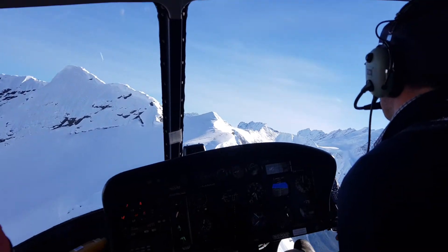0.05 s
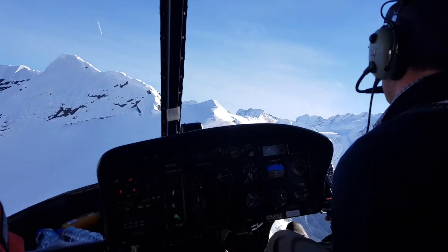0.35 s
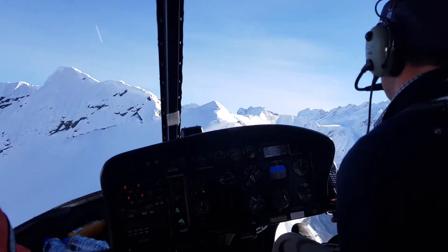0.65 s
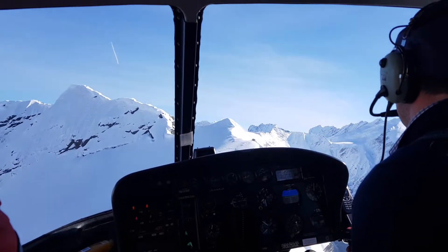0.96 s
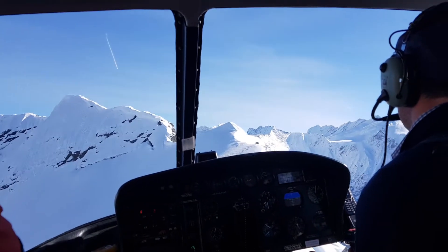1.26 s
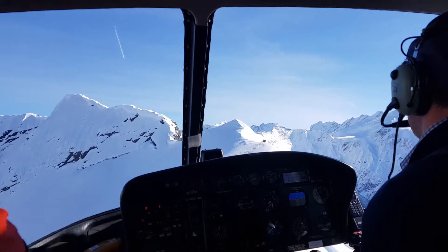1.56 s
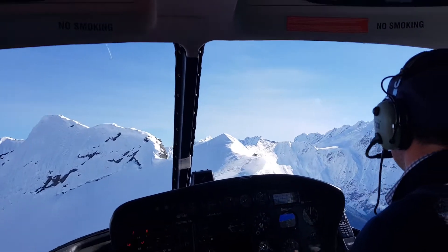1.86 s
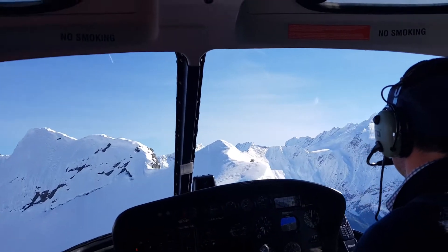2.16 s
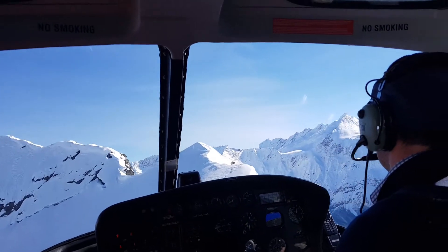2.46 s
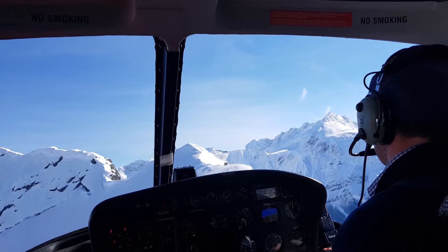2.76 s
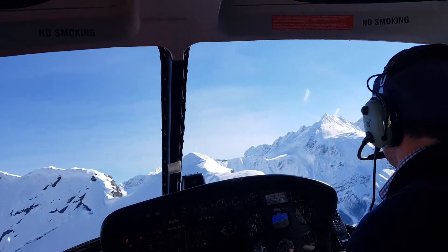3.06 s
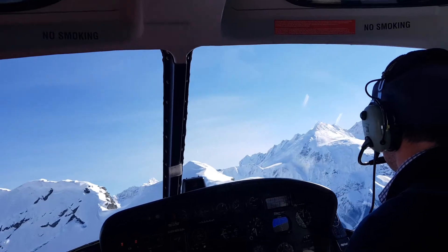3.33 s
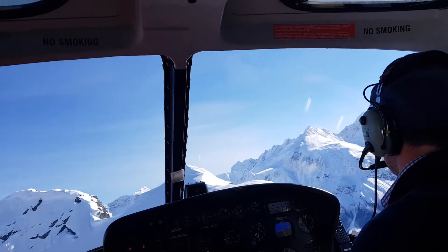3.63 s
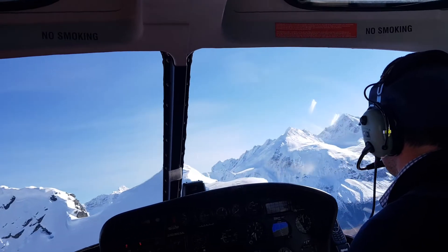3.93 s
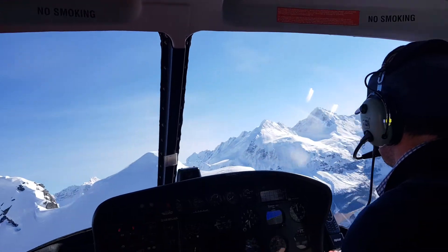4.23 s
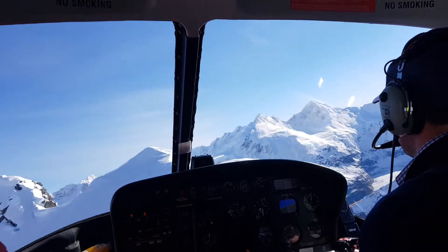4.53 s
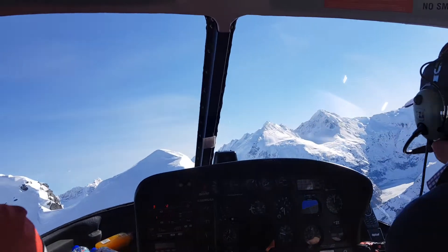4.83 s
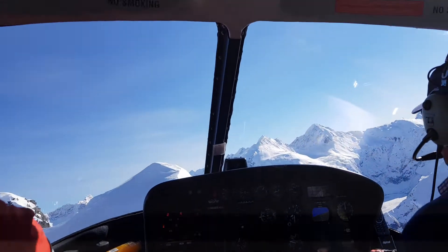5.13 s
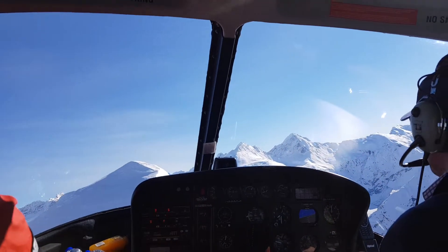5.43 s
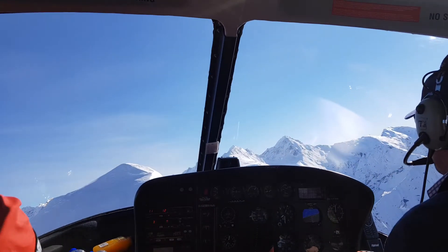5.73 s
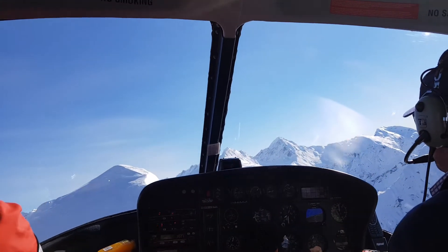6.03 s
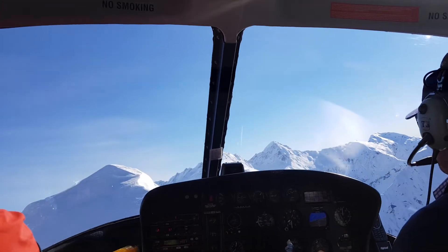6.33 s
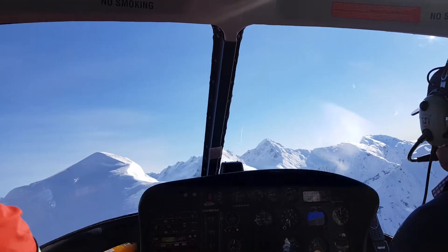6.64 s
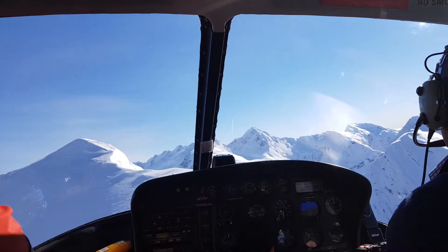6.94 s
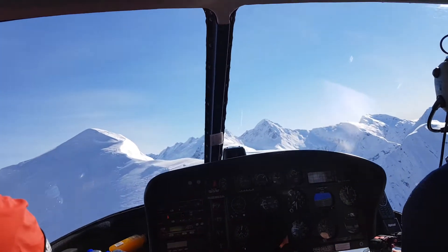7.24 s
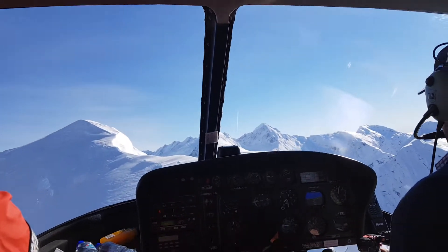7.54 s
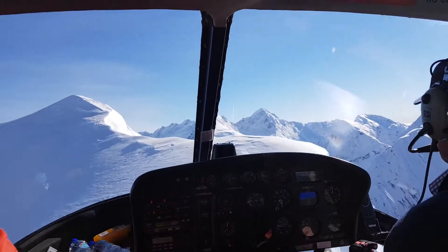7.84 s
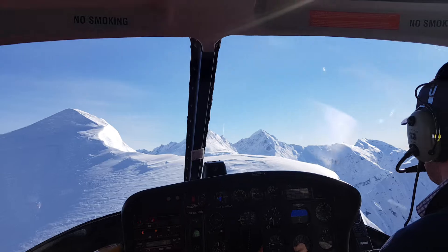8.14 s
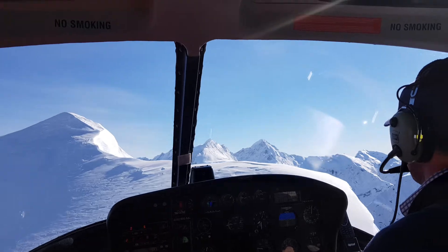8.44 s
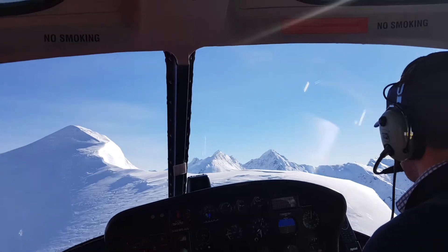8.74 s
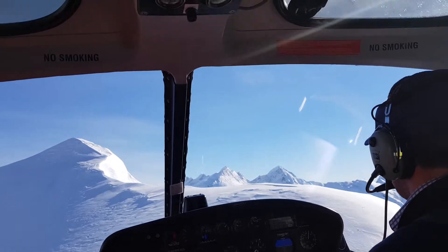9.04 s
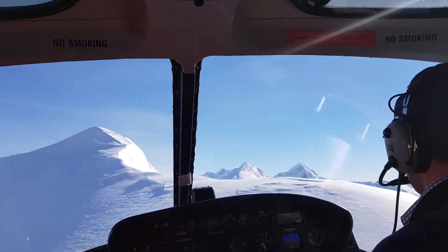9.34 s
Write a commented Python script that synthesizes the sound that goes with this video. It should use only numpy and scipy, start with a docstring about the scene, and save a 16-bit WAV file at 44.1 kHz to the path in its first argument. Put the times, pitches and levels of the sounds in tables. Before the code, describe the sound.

The sound is the cabin of a light helicopter in flight, heard from a seat through a hand-held stereo microphone. From the start, a fast, deep rotor thump beats against a low tail rotor drone, with a steady gear whine and fluttering gear tones close overhead, a very high turbine whistle and rushing air. At about 1.3 seconds the power eases and a thin, high valve hiss opens, lasting until about 5.4 seconds. Something loose gives one short, dry tick at 2 seconds. The rotor thump is heaviest around 3 to 4 seconds. From 5 seconds the turbine rises slightly in pitch, the drone strengthens and the wind grows while the thumping recedes. Uneven gusts slap the canopy between 5 and 7 seconds, then again near 8.3 and 9 seconds. The noise continues to the end at about 9.5 seconds.

```python
"""Cabin of a light turbine helicopter over mountains; a hand-held stereo pair, gearbox close overhead.
From the start the three-blade rotor thumps against the tail rotor's drone, gear teeth sing and the
turbine whistles high up. After a second the pilot eases off and the bleed valve hisses; something
loose ticks once. Near 3-4 s the rotor is loudest, sinking into its own wake. From 5 s the turbine
spools up again, the wind grows and gusts slap the canopy."""
import sys
import numpy as np
from scipy import signal
from scipy.fft import rfft, irfft, next_fast_len
from scipy.io import wavfile

SR = 44100
rng = np.random.default_rng(int(sys.argv[2]) if len(sys.argv) > 2 else 0)


def master_out(mix):
    """Clip the mix to full scale and print it as 16-bit PCM to the path in sys.argv[1]."""
    frames = np.transpose(np.atleast_2d(mix))
    ceiling = np.clip(frames, -1, 1)
    pcm = np.round(ceiling * 32767).astype(np.int16)
    wavfile.write(sys.argv[1], SR, pcm)


N = 418068
T = np.arange(N) / SR
HZ = np.fft.rfftfreq(N, 1 / SR)
BLADE_HZ, TAIL_HZ, MESH_HZ, BEVEL_HZ = 19.48, 68.62, 647.66, 1712  # at nominal shaft speed

# shaft speed, heard as the bevel gear's pitch: (time [s], pitch [Hz])
SHAFT_SPEED = [(0.0, 1707), (0.05, 1708), (0.39, 1713), (1.53, 1719), (3.11, 1714), (3.96, 1705),
               (4.83, 1706), (5.38, 1698), (7.42, 1715), (8.42, 1714), (9.06, 1695), (9.48, 1695)]
# the pilot eases off, then pulls the power back in: (time [s], torque [0-1])
SHAFT_TORQUE = [(0, 1), (1.2, 0.94), (2.1, 0.43), (3.4, 0.05), (4.8, .05), (5.4, 0.28), (6.5, 0.86),
                (7.2, 0.94), (8.1, 0.84), (9, 0.95), (9.48, 0.89)]
# how hard the air presses on the airframe: (time [s], air load [0-1])
AIRFRAME_LOAD = [(0, 0.03), (1, 0.02), (3.4, 0.14), (4.8, .28), (5.25, 0.79), (7, 1), (7.55, 0.56),
                 (8.7, 1), (9.48, 1)]
# the main rotor sinks into its own wake: (time [s], relative thump [dB], relative wash [dB])
ROTOR_WAKE = [(0, -22.5, -23.5), (1.2, -24.5, -24), (2, -23, -23), (3.2, -19, -19.5), (4.2, -18.5, -22),
              (5.3, -24, -20.5), (6.4, -27, -22.5), (7.2, -25.5, -23.5), (8.1, -32, -26.5), (8.9, -31, -28),
              (9.48, -35, -23)]
# main rotor harmonics: (multiple, relative level [dB])
BLADE_HARMONICS = [(1, -7), (2, -4.5), (3, -6.5), (4, -2.5), (5, -7), (6, -13), (7, -26.5), (8, -20),
                   (9, -22.5)]
# tail rotor harmonics: (multiple, relative level at first [dB], after power-up [dB])
TAIL_HARMONICS = [(1, 0.5, 0), (2, -10, -11.5), (3, -22.5, -12), (4, -29.5, -34), (5, -20.5, -21),
                  (6, -36, -40)]
# planet gear tones: (multiple, unloaded level [dB], added at full torque [dB],
# added at full air load [dB], left minus right [dB], flutter depth [factor], left lead [rad])
MESH_HARMONICS = [(1, -35, 7, -.5, 3, 0.13, 1.13), (2, -36, 10.5, -2, 4.5, 0.18, 1.18),
                  (3, -47.5, 8.5, 4.5, 0, 0.52, 1.35), (4, -48, 13, 0, -.5, 0.5, 1.47),
                  (5, -37, 6, 3.5, 2, 0.31, 1.45), (6, -50.5, 4.5, 7.5, 7.5, 0.32, 1.13),
                  (7, -52, 2.5, 4.5, -3, 0.42, 1.2), (8, -52, 10.5, 1, 3, 0.95, 1.47),
                  (9, -54.5, 7, -0.5, 3, 0.66, 1.9), (10, -53, 4, 0, 0, 1.8, 1.5),
                  (11, -69, 12, 5, -3, 1.8, 1.5)]
# chatter of the passing planets: (time [s], depth [factor])
PLANET_CHATTER = [(0, 0.73), (1.2, 0.61), (1.6, 0.14), (3.7, .3), (5.4, 1.3), (6, 1.1), (7.1, 0.29),
                  (8.8, .35), (9.48, 0.68)]
# one mesh tone rings in the cabin, swelling and fading: (time [s], added level [dB])
CABIN_RINGING = [(0, -2.5), (1.2, -3.5), (1.65, 2.5), (2.85, 2), (4.5, -3.5), (5.5, 0), (6.4, -2), (8.7, 4),
                 (9.48, -5.5)]
# the microphones drift through the bevel whine's standing wave:
# (time [s], relative level [dB], left minus right [dB], left lead [rad])
BEVEL_AT_MICS = [(0, -26.5, -1, 1.25), (.9, -26, 3, 1.73), (1.55, -26, 13, 0.99), (2, -28.5, 6.5, 0.11),
                 (3.2, -28.5, 6, -0.52), (4.1, -32, 15, -1), (4.6, -29.5, 7, -1.1), (5.4, -32.5, 12, -1.9),
                 (6.5, -30, 8, -0.43), (7.25, -32, 22, 0), (7.9, -30, 10, 0.25), (8.9, -31, 13, .3),
                 (9.48, -35, 12, 0.99)]
# pumps and accessory gears: (nominal pitch [Hz], level [dB], left minus right [dB])
ACCESSORY_TONES = [(690, -48.5, -8), (1682, -45.5, 0), (2377, -53, 4), (2680, -56, 3), (3140, -56, 3),
                   (3405, -56, -5)]
# air noises as heard from the seat, each: (frequency [Hz], relative density [dB])
WASH_SPECTRUM = [(10, -22), (30, -12), (50, -2), (75, 0.5), (125, 1.5), (165, -4.5), (220, -9),
                 (400, -27.5), (1000, -58)]
WIND_SPECTRUM = [(80, -18), (170, -4.5), (230, 0), (330, -3), (500, -6), (650, -9.5), (830, -18),
                 (1060, -17.5), (1400, -27), (2000, -27), (4000, -47)]
DOOR_SPECTRUM = [(300, -2), (900, 4), (1500, 3.5), (2200, -0.5), (2900, -3), (4200, -10), (6000, -20),
                 (7000, -21), (9000, -31), (16000, -42)]
HISS_SPECTRUM = [(1000, -0.5), (3000, 6.5), (5000, 7), (6200, 3), (7300, -0.5), (8000, -1.5), (9500, -2.5),
                 (11500, 3), (13000, 0), (14500, 1), (15700, 4)]
GUST_SPECTRUM = [(150, -23), (330, -7.5), (480, 4.5), (580, -4), (800, -12), (1080, -11), (1400, -26),
                 (3000, -36), (8000, -69)]
# gusts on the canopy: (start [s], length [s], level [dB], tilt [dB/octave])
CANOPY_GUSTS = [(4.98, 0.75, -26, -7), (5.75, 0.89, -29, -1), (6.655, .45, -23.5, 4), (8.3, 0.49, -32, -4),
                (9.05, 0.35, -26, -8)]
# the turbine's compressor tone: (time [s], pitch [Hz])
COMPRESSOR_PITCH = [(0, 8950), (.6, 8850), (1.3, 8760), (2.1, 8570), (3.2, 8680), (5, 8740), (6, 9020),
                    (7.8, 8990), (9.48, 9250)]
# the bleed valve opens in steps while the turbine runs slow: (start [s], length [s], level [dB])
BLEED_STEPS = [(1.27, 1.17, -42.5), (2.47, 1.42, -47), (3.89, 1.5, -45)]
# something loose in the cabin: (time [s], level [dB])
CABIN_KNOCKS = [(2.023, -16)]
# likeness of the air noise at the two microphones: (frequency [Hz], correlation [0-1])
MIC_CORRELATION = [(40, .99), (80, 0.86), (150, 0.87), (300, 0.85), (600, 0.64), (1200, 0), (2500, 0)]
# microphone colour, the left mostly louder: (frequency [Hz], left gain [dB], right gain [dB])
MIC_RESPONSE = [(60, 0.97, -.9), (250, 1, -1.6), (1050, 1.37, -1), (1990, -0.18, 0), (6380, -0.5, 0.5),
                (7300, 3.5, -10), (8000, 2, -17), (8800, 3.5, -8.5), (9700, 3.5, -7), (10700, 4.5, -5),
                (12000, 3, 0), (15600, 2.5, -3.5)]


def main_rotor(blades, uneven_db=1.5, gain_db=-.5, smear=.12):
    """Each blade passing overhead presses a thump into the cabin, whose ringing smears it."""
    thumps = sum(amp(db) * np.cos(2 * np.pi * k * blades - smear * (k - 3) ** 2)
                 for k, db in BLADE_HARMONICS)
    return np.sqrt(2) * thumps * amp(curves(ROTOR_WAKE)[0] + gain_db + uneven_db * drift(10))


def tail_rotor(clock, power_up_s=4, rise_s=3, gain_db=-21.5):
    """A drone from far aft, shaken by the main rotor's wake; torque lifts it and shifts its phase."""
    turns = TAIL_HZ * clock - .14 + .36 * curves(SHAFT_TORQUE)[0] + 0.008 * drift(3.4)
    powered = np.clip((T - power_up_s) / rise_s, 0, 1)
    drone = sum(amp(early_db + (late_db - early_db) * powered) * np.cos(2 * np.pi * k * turns)
                for k, early_db, late_db in TAIL_HARMONICS)
    return np.sqrt(2) * drone * loaded(torque_db=5.5) * amp(gain_db + .5 * drift(8.9))


def planet_gears(clock, mast, ringing_order=5):
    """Meshing teeth just overhead sing a harmonic series that flutters as five planets go round."""
    out = np.zeros((2, N))
    chatter = curves(PLANET_CHATTER)[0] * np.cos(2 * np.pi * 5 * mast)
    for order, db, torque_db, air_db, pan_db, depth, lead in MESH_HARMONICS:
        teeth = 0.97 * tooth_flutter(mast)
        shimmer = 0.59 * (drift(31) + 1j * drift(35))
        wobble = 1 + depth * (teeth + chatter + shimmer)
        turns = order * MESH_HZ * clock
        tone = cabin_tone(turns, pan_db + 2.5 * drift(0.77), lead + 0.35 * drift(0.5), wobble)
        ring_db = curves(CABIN_RINGING)[0] * (order == ringing_order)
        out += evened(tone) * amp(db + ring_db + 0.78 * drift(2.8)) * loaded(torque_db, air_db)
    return out


def tooth_flutter(mast, rolloff_order=7.8, size=1024):
    """Uneven teeth: a random pattern of strength and phase that repeats with each turn of the mast."""
    orders = np.r_[-12:0, 1:13]
    phases = np.exp(2j * np.pi * rng.random((3, len(orders))))
    weights = phases * rng.uniform(0.74, 1, phases.shape) / (1 + (orders / rolloff_order) ** 4)
    shared, *per_mic = weights @ np.exp(2j * np.pi * np.outer(orders, np.arange(size) / size))
    one_turn = evened(shared + 0.33 * np.array(per_mic))
    return one_turn[:, (mast * size).astype(int) % size]


def bevel_gear(clock, blades, gain_db=2.5, throb=0.021):
    """The loudest whine, close overhead: it grows with torque and throbs a little with each blade."""
    db, pan_db, lead = curves(BEVEL_AT_MICS)
    tone = cabin_tone(BEVEL_HZ * clock, pan_db, lead) * loaded(torque_db=5)
    return tone * amp(db + gain_db) * (blade_chop(blades, throb) + 0.07 * drift(40))


def airflow(blades):
    """Rotor wash, wind, door rush and hiss all round the microphones, chopped by the blades."""
    wash = air_noise(WASH_SPECTRUM) * amp(curves(ROTOR_WAKE)[1] + 2 + 0.64 * drift(3))
    wind = air_noise(WIND_SPECTRUM) * amp(-29 + 1.23 * drift(37)) * loaded(torque_db=.1, air_db=9.5)
    doors = air_noise(DOOR_SPECTRUM) * amp(-37) * loaded(torque_db=4.5, air_db=3.5)
    hiss = air_noise(HISS_SPECTRUM) * amp(-36) * loaded(torque_db=0.55, air_db=-0.5)
    return (wash + wind) * blade_chop(blades, 0.14) + (doors + hiss) * blade_chop(blades, 0.043)


def gusts(blades, lumps_db=3.5):
    """Rough air slaps the nearby canopy in quick, uneven lumps, chopped by the blades."""
    out = np.zeros((2, N))
    for start, length, db, tilt_db in CANOPY_GUSTS:
        air = air_noise([(hz, level + tilt_db * np.log2(hz)) for hz, level in GUST_SPECTRUM])
        out += air * amp(db) * swell(start, length, attack_s=0.18, release_s=0.28)
    return out * evened(amp(lumps_db * drift(70)) * blade_chop(blades, 0.27))


def turbine(blades, intake_ratio=1.186, bleed_hz=8600):
    """Beyond the cabin wall: a thin compressor tone, a broad intake whistle and bleed valve hiss."""
    hz = curves(COMPRESSOR_PITCH)[0]
    valve = np.max([amp(db) * swell(start, length, attack_s=.04, release_s=0.12)
                    for start, length, db in BLEED_STEPS], axis=0)
    intake = fuzzy_tone(hz * intake_ratio, width_hz=600) * amp(-44.5) * loaded(torque_db=6.6)
    compressor = fuzzy_tone(hz, width_hz=35) * (amp(-56) + 0.47 * valve)  # the open valve lets more out
    bleed = fuzzy_tone(np.full(N, bleed_hz), width_hz=1050) * valve
    return intake * blade_chop(blades, 0.14) + compressor + bleed


def knock(decay_s=0.0035, cutoff_hz=2500):
    """Something loose near the microphones gives a short dry tick."""
    envelope = sum(amp(db) * (T >= s) * np.exp(-abs(T - s) / decay_s) for s, db in CABIN_KNOCKS)
    lowpass = signal.butter(2, cutoff_hz, fs=SR)
    return envelope * evened(signal.lfilter(*lowpass, rng.standard_normal((2, N))))


def accessories(clock, fade_db=3.5):
    """Pumps and small gears on the same shaft whine faintly in the background."""
    return sum(cabin_tone(hz * clock, pan_db, lead=1.5) * amp(db + fade_db * drift(1.2))
               for hz, db, pan_db in ACCESSORY_TONES)


def cabin_tone(turns, pan_db, lead, wobble=1):
    """A tone in the cabin's standing waves: each microphone gets its own strength and phase."""
    side = np.array([[.5], [-.5]])
    gain = amp(side * pan_db)
    angle = 2 * np.pi * (turns % 1) + side * lead
    return 2 * gain / np.hypot(*gain) * np.real(wobble * np.exp(1j * angle))


def air_noise(spectrum):
    """Shaped noise at the two microphones, alike in the bass and unrelated in the treble."""
    size = next_fast_len(N)
    hz = np.fft.rfftfreq(size, 1 / SR)
    left, unrelated = rfft(rng.standard_normal((2, size)))
    likeness = np.interp(hz, HZ, spectra(MIC_CORRELATION)[0])
    right = likeness * left + np.sqrt(1 - likeness ** 2) * unrelated
    colour = amp(np.interp(hz, HZ, spectra(spectrum)[0]))
    return evened(irfft(np.array([left, right]) * colour, size)[:, :N])


def fuzzy_tone(hz, width_hz):
    """Turbulence ringing in a resonance that follows hz, unrelated at the two microphones."""
    pole = np.exp(-np.pi * width_hz / SR)
    noise = rng.standard_normal((2, N)) + 1j * rng.standard_normal((2, N))
    band = signal.lfilter([1], [1, -2 * pole, pole * pole], noise)
    return evened((band * np.exp(2j * np.pi * np.cumsum(hz) / SR)).real)


def blade_chop(blades, depth):
    """Gain that pulses once with each passing blade."""
    return 1 + depth * np.cos(2 * np.pi * blades)


def loaded(torque_db, air_db=0):
    """Gain of a source that changes by so many dB at full torque and at full air load."""
    return amp(torque_db * curves(SHAFT_TORQUE)[0] + air_db * curves(AIRFRAME_LOAD)[0])


def swell(start, length, attack_s, release_s):
    """Rises, holds, then dies away."""
    return np.clip((T - start) / attack_s, 0, 1) * np.exp(-np.maximum(T - start - length, 0) / release_s)


def drift(rate_hz, count=4096):
    """A smooth random curve, rms about 1, that changes about rate_hz times a second."""
    hz = np.fft.rfftfreq(count, T[-1] / count)
    slow = irfft(rfft(rng.standard_normal(count)) * np.exp(-(hz / rate_hz) ** 2))
    return np.interp(T, np.linspace(0, T[-1], count), evened(slow))


def curves(rows):
    """The columns of a time table, at every sample."""
    times, *columns = np.transpose(rows)
    return [np.interp(T, times, column) for column in columns]


def spectra(rows):
    """The columns of a frequency table, at every bin."""
    hz, *columns = np.transpose(rows)
    return [np.interp(np.log(HZ + 1), np.log(hz), column) for column in columns]


def amp(db):
    """Decibels to gain."""
    return 10 ** (np.asarray(db) / 20)


def evened(x):
    """Scales to rms 1."""
    return x / np.sqrt(np.mean(abs(x) ** 2) + 1e-20)


def scene():
    """The cabin from the seat: one shaft drives both rotors and all the gears."""
    clock = np.cumsum(curves(SHAFT_SPEED)[0] / BEVEL_HZ) / SR  # seconds of running at nominal speed
    blades = BLADE_HZ * clock - .09  # count of blade passes
    mast = blades / 3  # turns of the mast
    gears = planet_gears(clock, mast) + bevel_gear(clock, blades) + accessories(clock)
    rotors = main_rotor(blades) + tail_rotor(clock)
    return rotors + gears + airflow(blades) + gusts(blades) + turbine(blades) + knock()


def record(dry, knee=0.51, headroom=0.27, cutoff_hz=15830):
    """The hand-held pair: each microphone's colour, a soft ceiling on peaks, then the band limit."""
    coloured = irfft(rfft(dry) * amp(spectra(MIC_RESPONSE)), N)
    clipped = np.clip(coloured, -knee, knee)
    softened = clipped + headroom * np.tanh((coloured - clipped) / headroom)
    lowpass = signal.firwin(1023, cutoff_hz, window=("kaiser", 9), fs=SR)
    return signal.oaconvolve(softened, lowpass[None], "same", axes=1)


dry = scene()
out = record(dry)
master_out(out)
```